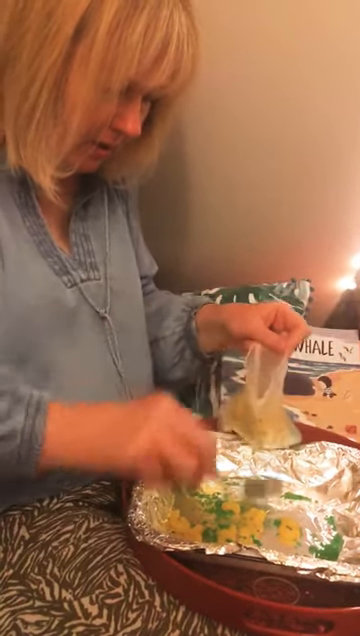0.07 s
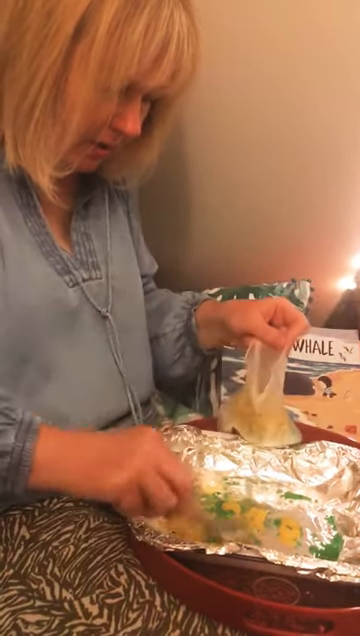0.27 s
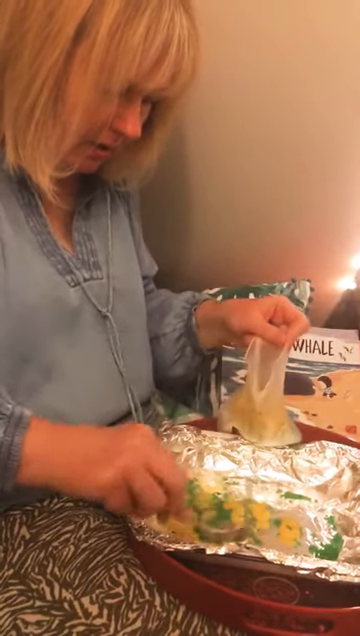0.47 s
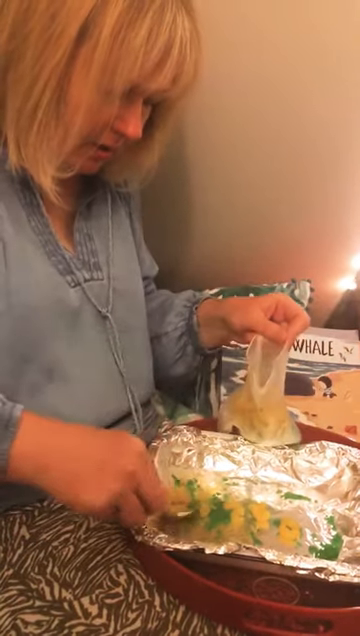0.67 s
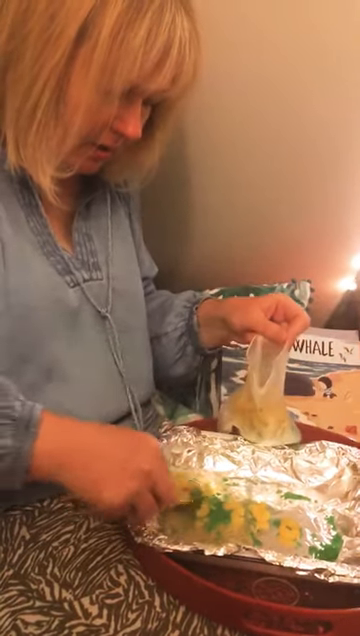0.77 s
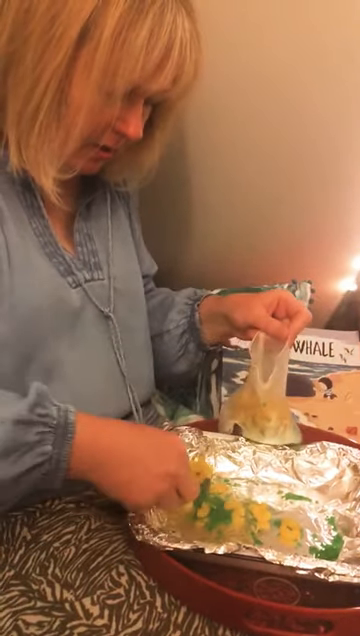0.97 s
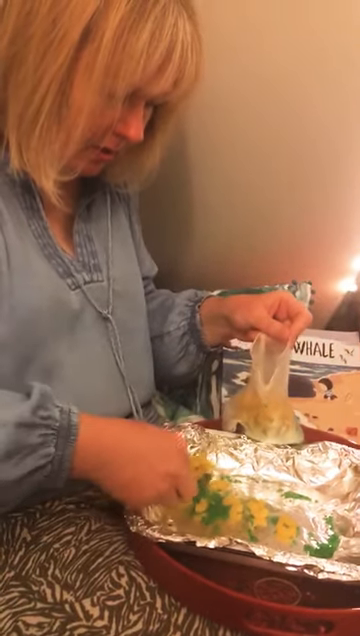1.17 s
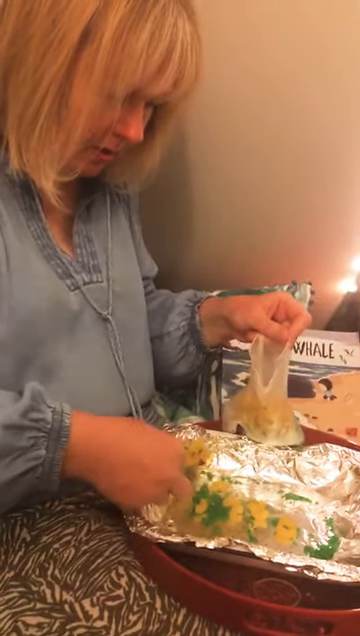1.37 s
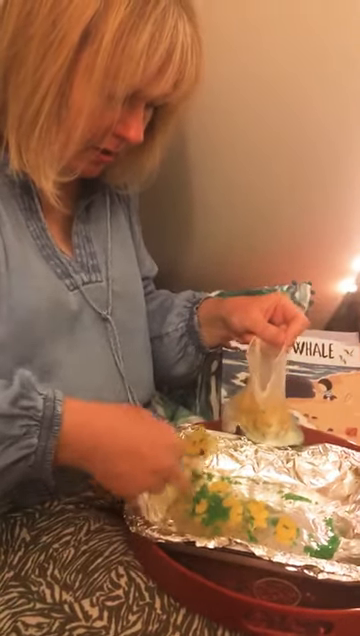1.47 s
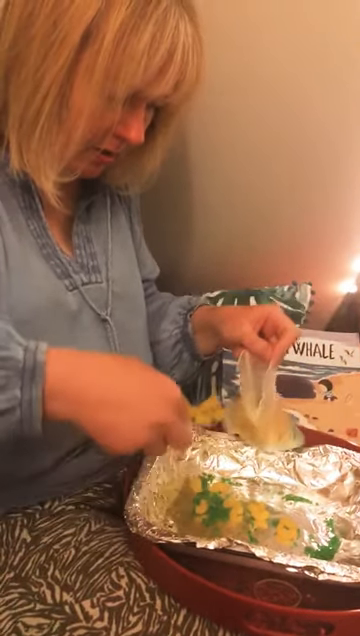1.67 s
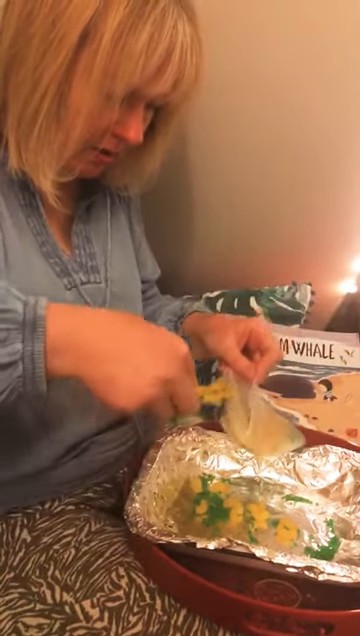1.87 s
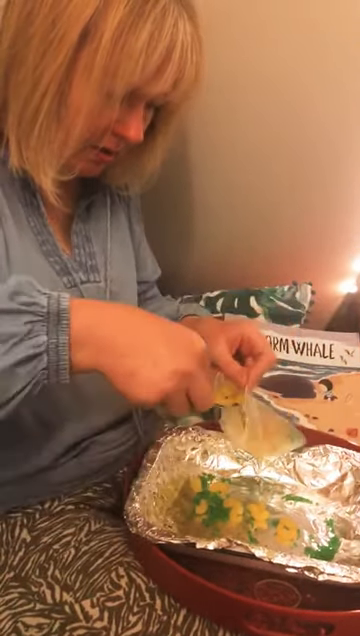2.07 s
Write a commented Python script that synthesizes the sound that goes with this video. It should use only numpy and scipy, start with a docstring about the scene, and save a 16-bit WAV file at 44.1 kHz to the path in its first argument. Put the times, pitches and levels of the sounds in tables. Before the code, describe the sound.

Foil crinkles as a hand gathers loose bits from a lined tray. A few hollow bumps and a light finger scrape come first, then rustling with small crisp snaps that fades away, heard close in a small quiet room.

```python
"""A few hollow bumps and a rustle of foil: a hand gathers loose bits from a foil-lined tray.
Each bump rings the tray and rattles its lining. The hand drags on, then lifts away: its fingers
rasp on the floor, the foil rustles with tiny buckles, and single creases snap and ring briefly.
Around it is a small quiet room with soft air and a faint low hum."""
import sys
import numpy as np
from scipy import signal
from scipy.fft import rfft, irfft, next_fast_len
from scipy.io import wavfile

SR = 44100
rng = np.random.default_rng(int(sys.argv[2]) if len(sys.argv) > 2 else 0)


def to_wav(s):
    """Save 16-bit WAV."""
    ch = np.atleast_2d(s).T  # columns
    pcm = np.round(np.clip(ch, -1, 1) * 32767)  # PCM
    wavfile.write(sys.argv[1], SR, pcm.astype(np.int16))


N = 92610

# room tone, the colour of still air: f/Hz, relative level/dB
AIR_EQ = [(12, -66), (25, -34), (45, -12.5), (70, -2), (100, -0.5), (150, -1.5), (230, -4), (450, -9.5),
          (1000, -15), (2500, -21), (6000, -25), (11500, -31.5)]
# a low hum sinks, then returns higher: t/s, level/dB, f/Hz
HUM_PATH = [(.1, -87, 139.2), (0.361, -71, 116.7), (.53, -66.5, 97), (.62, -70, 88.8), (.85, -74.5, 92),
            (.95, -104, 95), (1.25, -84, 157.7), (1.5, -68.5, 145.5), (1.85, -85, 134.4), (2.08, -68, 125)]
# fingers scraping the tray's floor through the lining: t/s, level/dB
SCRAPE_FADER = [(.235, -85), (.26, -45.5), (.315, -43.5), (.355, -36), (.39, -51), (.46, -54), (.54, -57.5),
                (.60, -41), (.65, -46), (.72, -55), (.82, -66.5), (.88, -57), (.99, -55.5), (1.13, -60.5),
                (1.2, -66.5), (1.52, -61.5), (1.72, -68.5), (1.95, -77.5)]
# colour of the lining when bumped or scraped: f/Hz, relative level/dB
LINING_EQ = [(100, -25.5), (195, -38.5), (270, -9.5), (335, -25), (410, -7), (750, -4), (1000, -3.5),
             (1500, -2.5), (1800, -5.5), (2050, -4), (2600, -6), (3200, -1), (4300, -3), (5500, -7.5),
             (8000, -3), (11500, -8.5)]
# modes of the tray: f/Hz, relative level/dB, t60/s
TRAY_MODES = [(262, -22, .12), (380.4, -12.5, 0.33), (460.6, -7.5, 0.14), (583, -9.5, .14), (620, -7, .12),
              (916, -1.5, 0.053), (1046, 1, 0.027), (1270, 1.5, 0.065), (1380, -13.5, .1), (1535, -16, .09),
              (1543, 2, .11), (1650, -22.5, 0.21), (1989, -2.5, 0.088), (4260, -6, .07)]
# bumps: t/s, level/dB, rise/s, tray ring trim/dB, floor f/Hz, floor trim/dB, dull above f/Hz
BUMP_CUES = [(0.2394, -38.5, 0.009, -7, 603, -21.5, 8000), (0.2833, -24, 0.0091, -16, 404, -29, 3780),
             (0.2974, -18, 0.0016, -2, 429.4, 0, 6000), (0.33, -32.5, 0.0051, -10.5, 401.5, 4.5, 9000),
             (.456, -40, 0.0045, -22, 382, -9, 3500), (.5655, -28.5, 0.0046, -17.5, 392, -9, 5100),
             (0.569, -17.5, 0.0034, -3, 396.7, -2, 3815), (0.615, -20.5, 0.0047, -8, 403.6, -3, 8810),
             (.644, -37.5, 0.0034, 0, 398.4, 6.5, 4970), (.852, -33, 0.0026, -8.5, 563, -12, 4500),
             (1.022, -35.5, 0.0022, -3, 291, -5, 1010)]
# how hard the hand rubs the foil: t/s, level/dB
RUB_FADER = [(.235, -107), (.25, -46.5), (.335, -38.5), (.39, -44.5), (.49, -46), (0.544, -54.5),
             (.64, -34.5), (.74, -42.5), (.80, -40.5), (.86, -34), (.90, -39.5), (1.02, -37.5), (1.10, -56),
             (1.19, -61), (1.225, -50), (1.29, -42.5), (1.355, -48.5), (1.425, -39.5), (1.50, -42),
             (1.595, -44.5), (1.68, -66.5), (1.78, -82), (1.88, -74), (1.97, -83.5), (2.1, -80)]
# colour of the rustle: f/Hz, relative level/dB
RUSTLE_EQ = [(120, -21), (300, -30.5), (700, -25.5), (1100, -13.5), (1900, -11), (2500, -8), (3500, -3.5),
             (4200, 0), (4650, -0.5), (5100, -3), (7000, -4), (9500, -5.5), (11500, -7.5)]
# a taut patch of foil sings under the hand: t/s, level/dB relative to the rustle
SINGING_FADER = [(.55, -36), (.75, -20), (.88, -14), (1.1, -25), (1.3, -22), (1.37, -13), (1.43, -6),
                 (1.48, -5), (1.6, -18)]
# creases snapping: t/s, level/dB, rise/s, facet f/Hz, facet ring trim/dB
SNAP_CUES = [(0.111, -67, 0.001, 4550, -6.5), (0.2418, -34, 0.0011, 2092, -5.5),
             (0.245, -31, 0.0061, 8400, -10), (0.411, -36, 0.0043, 6760, -17),
             (.479, -40, 0.0046, 8250, -20), (0.6173, -32, 0.0006, 6670, -15),
             (.708, -37, 0.0022, 9900, -5), (0.768, -34.5, .0005, 4360, -5),
             (0.8075, -30, 0.00083, 4690, -3), (0.821, -41, .0005, 8500, 8), (.856, -34.5, 0.0015, 3510, 0),
             (0.8694, -29, 0.00044, 4650, -1.5), (0.878, -29, 0.0018, 1820, -12),
             (.914, -34, 0.0013, 9500, -9), (.948, -32, 0.00058, 2050, -11.5),
             (0.9663, -35, 0.0015, 4800, 0.5), (0.983, -33, 0.0005, 4140, -23),
             (1.0306, -38, 0.00033, 6560, 4.5), (1.0544, -29, 0.0005, 4470, -3),
             (1.056, -36, 0.00077, 1863, 0.5), (1.073, -37, 0.0017, 4430, -2.5),
             (1.2039, -40, 0.00038, 5800, -5), (1.216, -39.5, 0.0008, 8230, -3),
             (1.233, -35, 0.0022, 5940, -11), (1.4126, -46.5, 0.00077, 4720, 9),
             (1.489, -26.5, .0003, 9700, -8), (1.5178, -31.5, 0.0027, 7050, -4.5),
             (1.5613, -38.5, 0.0015, 4420, 1), (1.572, -37, 0.00024, 1860, -4),
             (1.597, -40, 0.00071, 4430, -4), (1.657, -49.5, 0.00057, 4000, -19),
             (1.6919, -76, 0.00044, 3170, -5), (1.835, -53, .0003, 3640, -13),
             (2.0336, -64.5, 0.0056, 4510, -1), (2.068, -73, .001, 6600, 3)]
# colour of a snap: f/Hz, relative level/dB
SNAP_EQ = [(120, -23), (400, -28), (900, -15.5), (2000, -10), (3000, -3.5), (4500, -3), (6000, -1),
           (9000, 1), (11500, -5)]

AIR_DB, CUTOFF_HZ = -67.5, 11800
ROOM_DB, ROOM_RISE_S, ROOM_T60_S = -12, .003, .36
TREBLE_ABOVE_HZ, TREBLE_T60_S = 2900, .16
SCRAPE_DULL_HZ, SCRAPE_GRAIN_DB = 2700, 2.9
BODY_TRIM_DB, RATTLE_T60_S, FLOOR_T60_S = -7.5, .068, .14
BUCKLES_PER_S, BUCKLE_SPREAD_DB, SLIDE_DB, FLICKER_DB = 1800, 4, 3.5, 2
SINGING_HZ, SINGING_WIDTH_HZ = 4755, 200
SNAP_T60_S, FACET_T60_S, FACET_WANDER_HZ = .027, .034, 170


def from_db(db):
    """Decibels to gain."""
    return 10 ** (np.asarray(db) / 20)


def rms_one(x):
    """Scale to unit rms."""
    return x / np.sqrt(np.mean(x ** 2) + 1e-20)


def fader(curve):
    """Gain at every sample from (t/s, level/dB) points."""
    return from_db(np.interp(np.arange(N) / SR, *np.transpose(curve)))


def colour(x, points):
    """Causal EQ through (f/Hz, level/dB) points; white noise keeps its power below the cutoff."""
    size = 2 * next_fast_len(N)
    hz, db = np.transpose(points)
    grid = np.maximum(np.arange(size // 2 + 1) * SR / size, 1)
    gain = from_db(np.interp(np.log(grid), np.log(hz), db))
    gain = gain / np.sqrt(np.mean(gain ** 2 * (grid < CUTOFF_HZ)))
    # minimum phase, so nothing rings ahead of an attack
    cepstrum = irfft(np.log(gain))
    cepstrum[1:size // 2] *= 2
    cepstrum[size // 2 + 1:] = 0
    return irfft(rfft(x, size) * np.exp(rfft(cepstrum)))[:N]


def dull(x, above_hz):
    """Roll the top off gently."""
    return signal.lfilter(*signal.butter(1, above_hz, fs=SR), x)


def drift(rate_hz):
    """Smooth random modulation; rms 1."""
    r = np.exp(-2 * np.pi * rate_hz / SR)
    smooth = signal.lfilter([1], [1, -2 * r, r * r], rng.standard_normal(N + SR // 2))
    return rms_one(smooth[SR // 2:])


def envelope(t, rise_s, t60):
    """A straight attack, then an exponential decay."""
    attack = np.clip(t / max(rise_s, 1 / SR), 0, 1)
    return attack * from_db(-60 * np.maximum(t - rise_s, 0) / t60)


def ring(t, hz, rise_s, t60):
    """One struck mode."""
    return np.sin(2 * np.pi * hz * t) * envelope(t, rise_s, t60)


def resonant_noise(hz, width_hz):
    """Noise twice through one resonance; rms 1."""
    r = np.exp(-np.pi * width_hz / SR)
    x = rng.standard_normal(N + SR // 4)
    for _ in range(2):
        x = signal.lfilter([1, 0, -1], [1, -2 * r * np.cos(2 * np.pi * hz / SR), r * r], x)
    return rms_one(x[SR // 4:])


def wandering_tone(hz, wander_hz, rate_hz, size):
    """A sine whose pitch strays at random; rms 1."""
    r = np.exp(-2 * np.pi * rate_hz / SR)
    stray = rms_one(signal.lfilter([1], [1, -r], rng.standard_normal(size)))
    return np.sqrt(2) * np.sin(2 * np.pi * np.cumsum(hz + wander_hz * stray) / SR)


def add(out, s, sound):
    """Mix a sound in at time s."""
    start = int(np.clip(s * SR, 0, N - 1))
    out[start:start + len(sound)] += sound[:N - start]


def air():
    """The room's still air: a steady bed of dark noise."""
    return from_db(AIR_DB) * colour(rng.standard_normal(N), AIR_EQ)


def hum():
    """A faint, wavering hum that glides in pitch and level."""
    s, db, hz = np.transpose(HUM_PATH)
    t = np.arange(N) / SR
    tone = wandering_tone(np.interp(t, s, hz), wander_hz=4.2, rate_hz=22, size=N)
    return from_db(np.interp(t, s, db)) * tone


def room_reverb(x):
    """Dense reflections from near walls; the treble dies first."""
    t = np.arange(SR // 2) / SR
    noise = rng.standard_normal(len(t))
    low = dull(noise, TREBLE_ABOVE_HZ)
    tail = low * envelope(t, ROOM_RISE_S, ROOM_T60_S)
    tail += (noise - low) * envelope(t, ROOM_RISE_S, TREBLE_T60_S)
    return from_db(ROOM_DB) * signal.fftconvolve(x, tail / np.sqrt(np.sum(tail ** 2)))[:N]


def finger_scrape():
    """Friction on the tray's floor: a dull, grainy rasp."""
    friction = rng.standard_normal(N) * from_db(SCRAPE_GRAIN_DB * drift(rate_hz=130))
    rasp = dull(colour(friction, LINING_EQ), SCRAPE_DULL_HZ)
    return rms_one(rasp) * fader(SCRAPE_FADER)


def tray_bumps():
    """Each bump rings the tray and rattles its lining, each with its own brightness."""
    t = np.arange(SR // 2) / SR
    body, lining = np.zeros(N), np.zeros(N)
    for s, db, rise_s, ring_db, floor_hz, floor_db, dull_hz in BUMP_CUES:
        modes = 0
        for hz, mode_db, t60 in TRAY_MODES:
            gain = from_db(mode_db) / np.hypot(1, (hz / dull_hz) ** 2)
            modes += rng.choice([-1, 1]) * gain * ring(t, hz, rise_s, t60)
        # the floor's pitch depends on where the hand presses
        floor = from_db(floor_db) * ring(t, floor_hz, rise_s, FLOOR_T60_S)
        add(body, s, from_db(db + BODY_TRIM_DB) * (from_db(ring_db) * modes + floor))
        rattle = rng.standard_normal(len(t)) * envelope(t, rise_s, RATTLE_T60_S)
        add(lining, s, from_db(db) * dull(rattle, dull_hz))
    low_cut = signal.butter(4, 235, "high", fs=SR, output="sos")
    return signal.sosfilt(low_cut, body + colour(lining, LINING_EQ))


def foil_rustle():
    """Tiny buckles excite facets of many pitches over the hiss of sliding; one taut patch sings."""
    sizes = from_db(BUCKLE_SPREAD_DB * np.minimum(rng.exponential(1, N), 4))
    buckles = rms_one(sizes * (rng.random(N) < BUCKLES_PER_S / SR))
    edges_hz = np.geomspace(150, 13000, num=15)
    crinkle = np.zeros(N)
    for low, high in zip(edges_hz, edges_hz[1:]):
        clicks = buckles * rng.choice([-1, 1], N)
        hiss = from_db(SLIDE_DB) * rng.standard_normal(N)
        band_pass = signal.butter(2, [low, high], "band", fs=SR, output="sos")
        flicker = rms_one(from_db(FLICKER_DB * drift(rate_hz=23)))
        crinkle += signal.sosfilt(band_pass, rms_one(clicks + hiss)) * flicker
    singing = fader(SINGING_FADER) * resonant_noise(SINGING_HZ, SINGING_WIDTH_HZ)
    return (colour(crinkle, RUSTLE_EQ) + singing) * fader(RUB_FADER)


def crease_snaps():
    """A crease gives way in a burst of crackle, and the facet beside it rings roughly."""
    t = np.arange(SR // 10) / SR
    crackle, facets = np.zeros(N), np.zeros(N)
    for s, db, rise_s, hz, ring_db in SNAP_CUES:
        burst = rng.standard_normal(len(t)) * envelope(t, rise_s, SNAP_T60_S)
        add(crackle, s, from_db(db) * burst)
        facet = wandering_tone(hz, FACET_WANDER_HZ, rate_hz=260, size=len(t))
        add(facets, s, from_db(db + ring_db) * facet * envelope(t, rise_s, FACET_T60_S))
    return colour(crackle, SNAP_EQ) + facets


def scene():
    """Mono mix: tray and foil up front, with air, reverb and hum behind."""
    tray = foil_rustle() + finger_scrape() + tray_bumps() + crease_snaps()
    return (tray + air() + room_reverb(tray) + hum())[None]


def record(dry):
    """A steep high cut on the whole mix."""
    return signal.sosfilt(signal.ellip(12, .2, 75, CUTOFF_HZ, fs=SR, output="sos"), dry)


dry = scene()
out = record(dry)
to_wav(out)
```